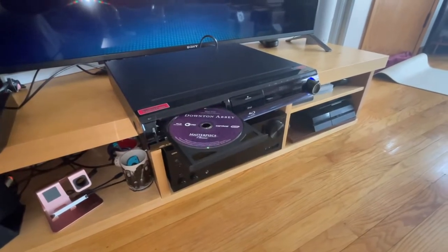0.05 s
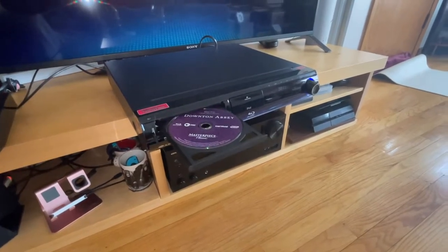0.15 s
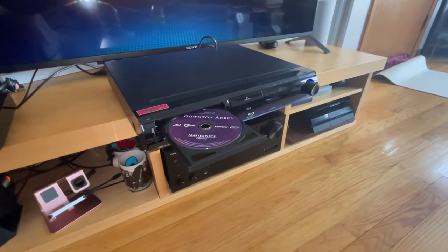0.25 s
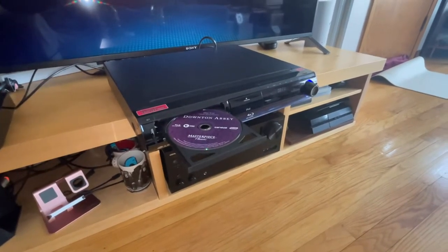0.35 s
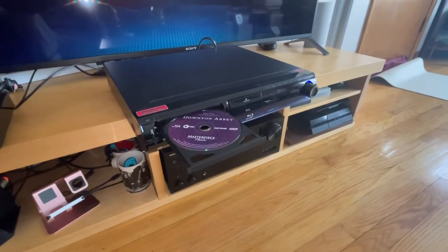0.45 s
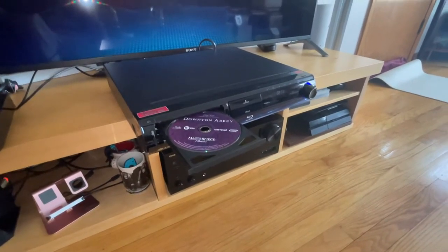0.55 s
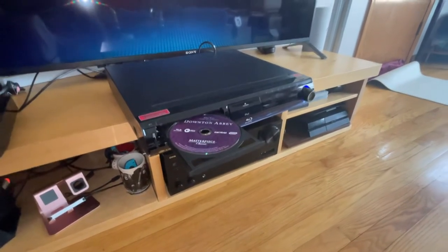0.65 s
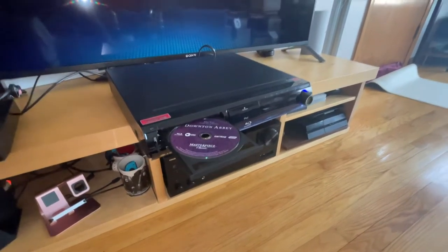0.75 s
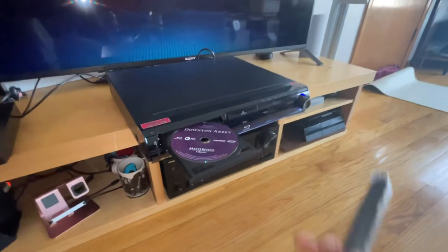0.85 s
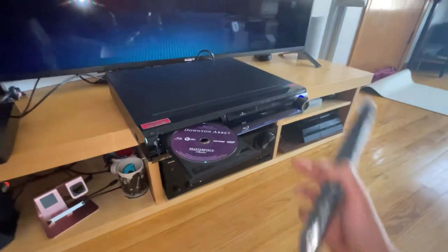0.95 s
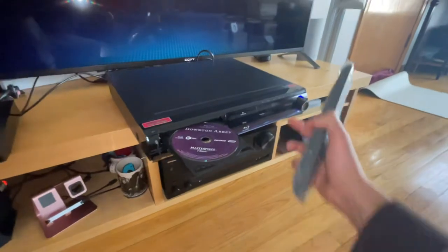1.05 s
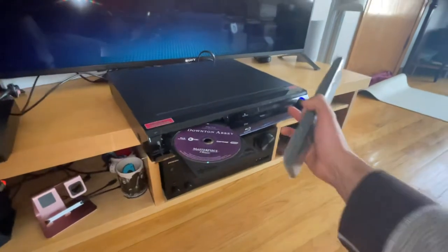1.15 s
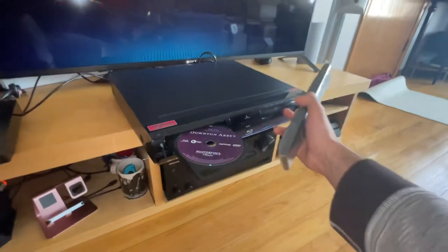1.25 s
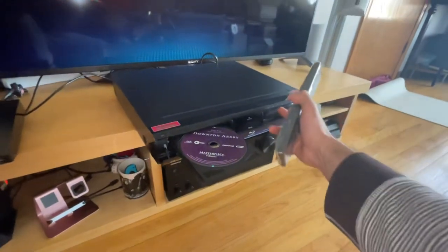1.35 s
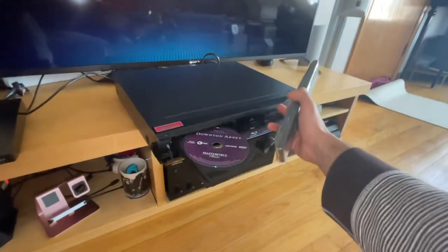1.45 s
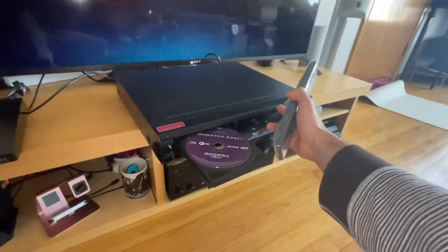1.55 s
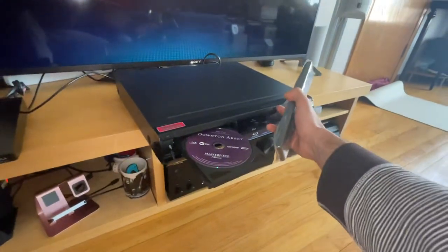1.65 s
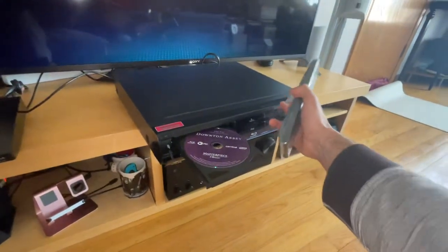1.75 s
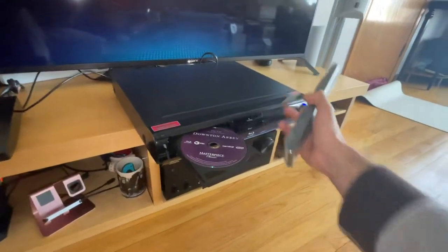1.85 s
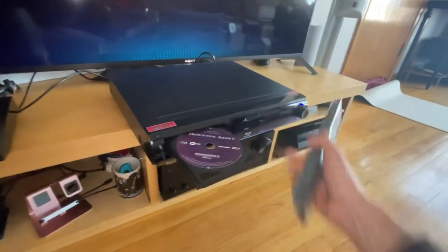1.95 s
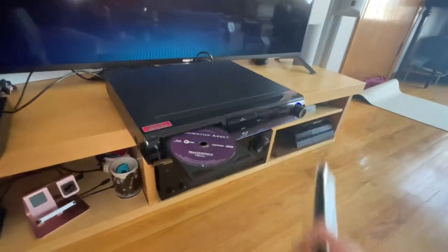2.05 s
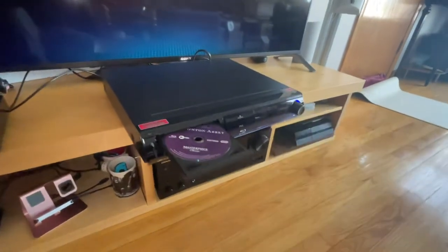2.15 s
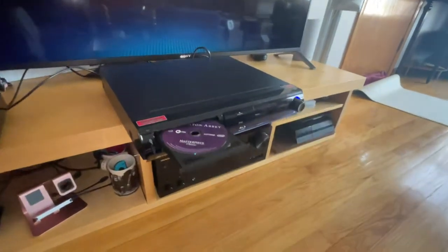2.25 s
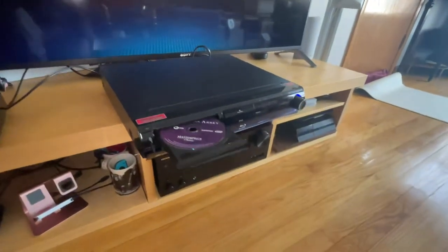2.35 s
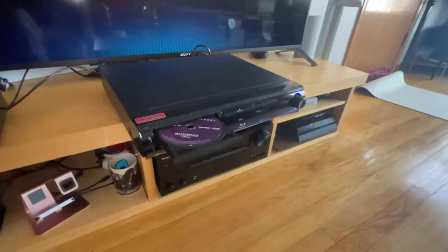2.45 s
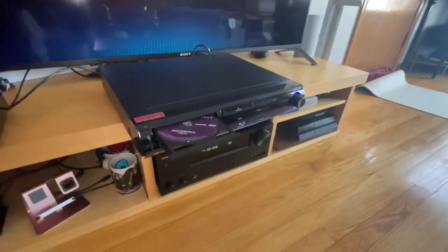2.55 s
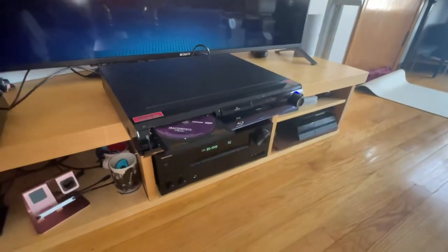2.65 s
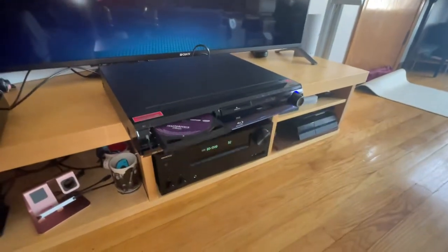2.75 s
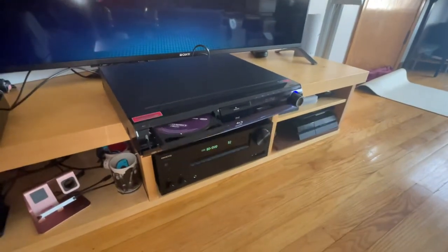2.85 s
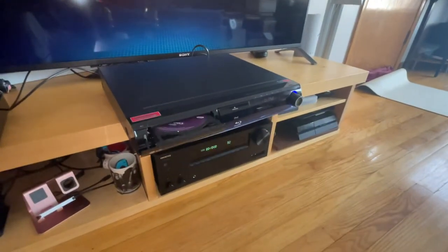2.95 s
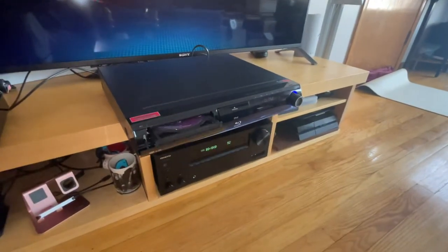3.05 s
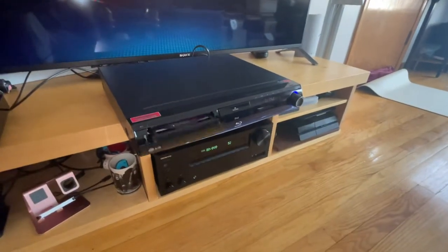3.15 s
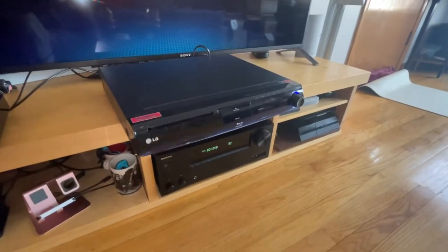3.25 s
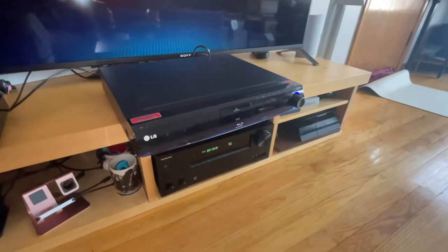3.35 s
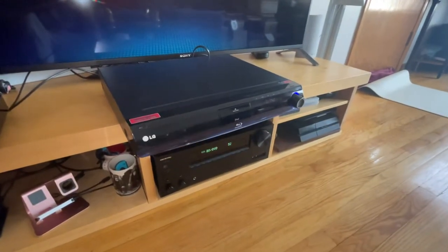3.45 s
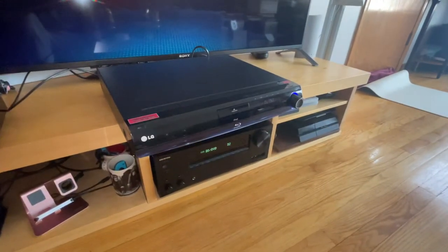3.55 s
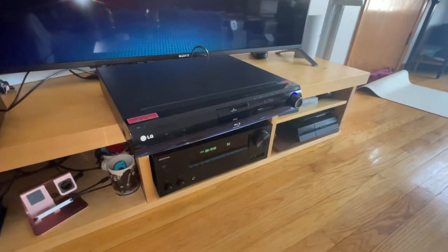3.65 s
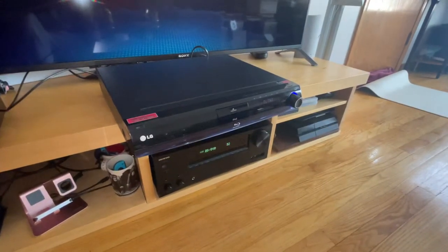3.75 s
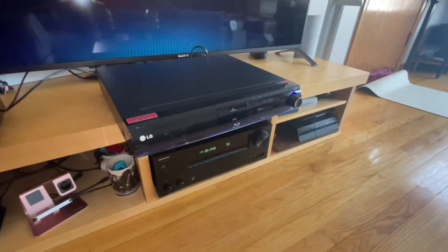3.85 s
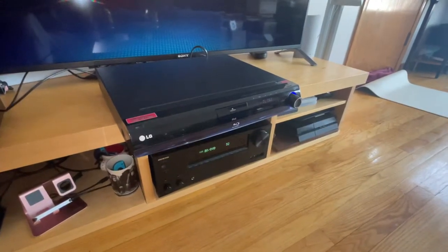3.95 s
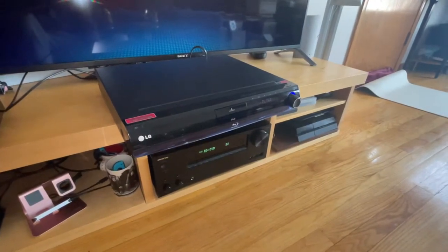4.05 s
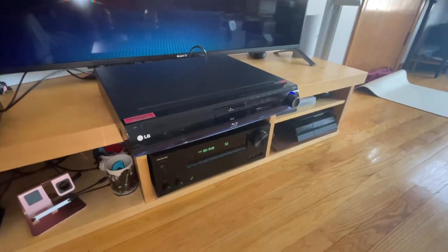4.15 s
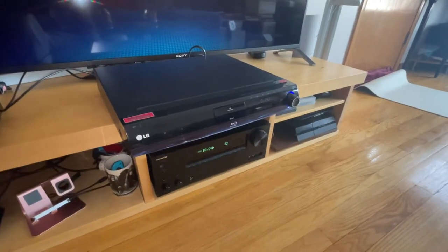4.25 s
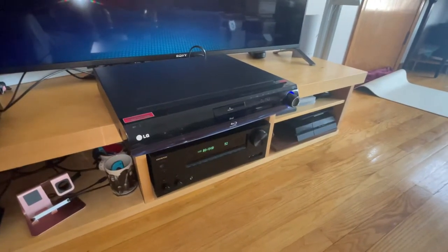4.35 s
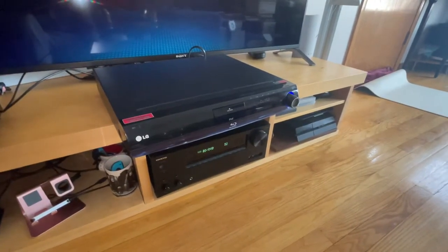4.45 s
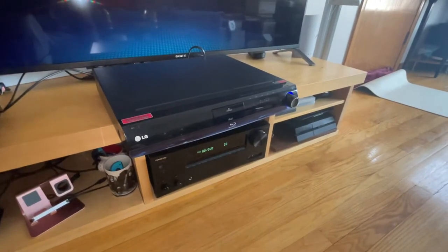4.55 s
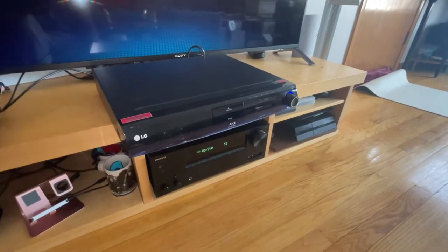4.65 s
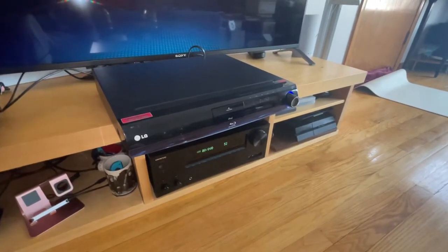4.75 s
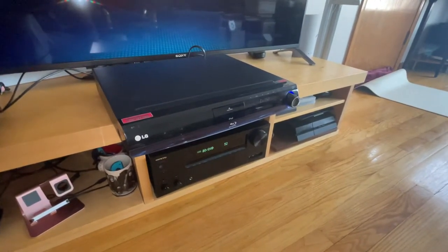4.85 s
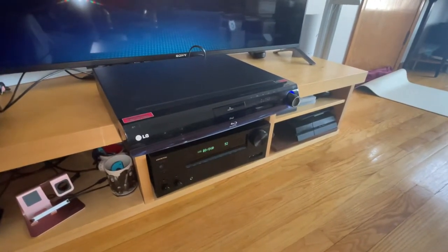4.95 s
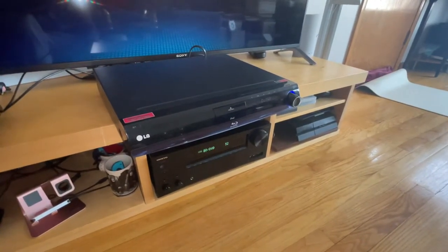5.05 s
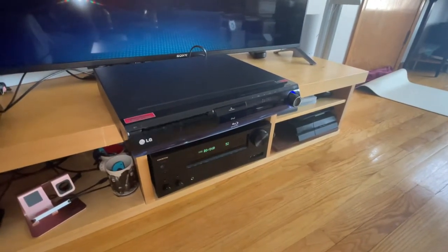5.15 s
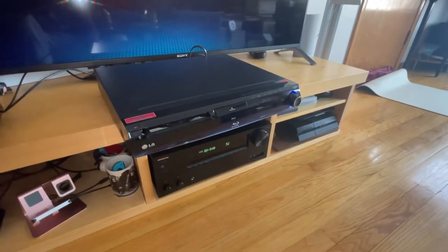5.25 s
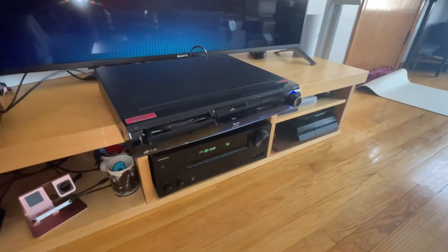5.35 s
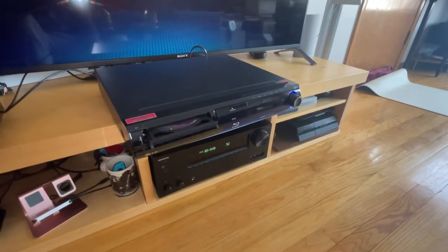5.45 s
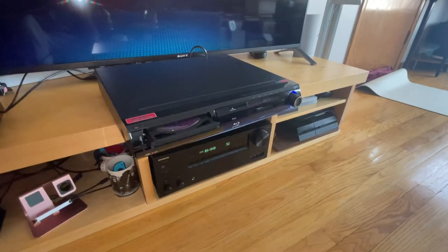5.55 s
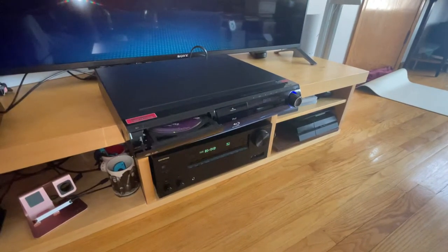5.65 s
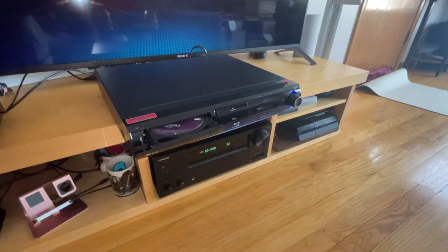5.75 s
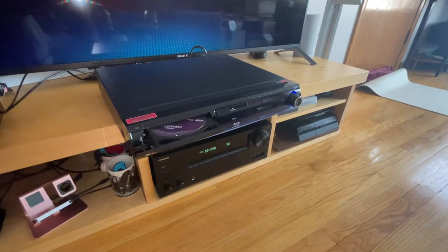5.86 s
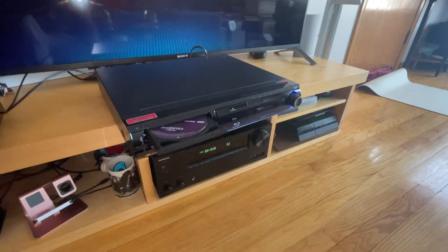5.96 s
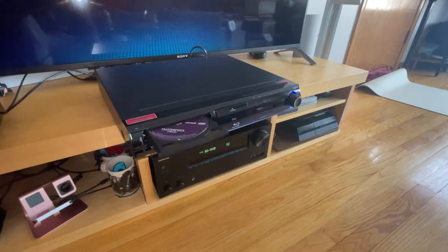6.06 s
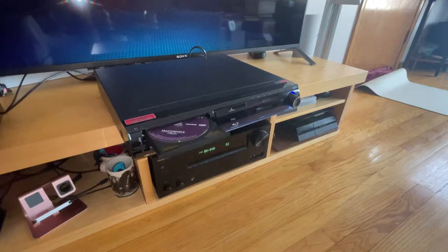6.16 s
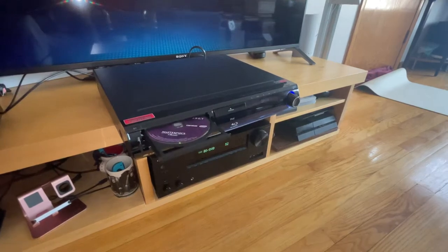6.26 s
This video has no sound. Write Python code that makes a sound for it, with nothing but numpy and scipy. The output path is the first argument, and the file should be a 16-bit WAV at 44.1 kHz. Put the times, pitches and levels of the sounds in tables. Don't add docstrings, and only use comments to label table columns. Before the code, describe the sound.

Close stereo microphone in a quiet, softly furnished living room. A low engine drone passes outside over traffic rumble while a sleeve rustles and a hand-held remote ticks. A disc tray motor starts with a click, whirs and hisses along its rails, then latches with sharp snaps and a hollow plastic clatter. After a quiet pause, the mechanism clunks, unlatches and whirs open again.

```python
import sys
import numpy as np
from scipy import signal
from scipy.fft import rfft, irfft, next_fast_len
from scipy.io import wavfile

SR = 44100
rng = np.random.default_rng(int(sys.argv[2]) if len(sys.argv) > 2 else 0)


def boost(x):
    u = np.asarray(x, float) / 20
    return 10 ** u


def transcribe(signal):
    frames = np.atleast_2d(signal).T
    limited = np.clip(frames, -1, 1)
    pcm = np.round(limited * 32767).astype(np.int16)
    wavfile.write(sys.argv[1], SR, pcm)


N = 278271
T_S = np.arange(N) / SR

# f/Hz, likeness/1
EAR_LIKENESS = [(60, 0.54), (130, 0.85), (290, 0.542), (640, -0.327), (1410, -0.3), (3100, 0.22),
                (6820, -0.08), (15000, 0.39)]

# f/Hz, density/(dB per Hz)
HOUSE_COLOUR = [(10, -29), (22, -12), (35, 0.5), (50, -5.5), (80, -40), (200, -140)]
HOUSE_DB = -68.5
# f/Hz, density/(dB per Hz)
AIR_COLOUR = [(240, -30), (400, -15), (460, -4), (839, -11), (994, -4.5), (1110, -12), (1380, -9),
              (1600, -15.5), (1870, -17.5), (2180, -22.5), (3810, -31.5), (7170, -30.5), (9500, -44.5),
              (12500, -52), (16000, -70)]
AIR_DB = -69.5
WHINE_HZ, WHINE_DB = 8050, -100

# t/s, rumble level/dB
STREET_LEVEL = [(0, -50.5), (.6, -49.5), (2.2, -48), (3.0, -53.5), (3.3, -52.5), (3.7, -53.5), (4.7, -57.5),
                (5.05, -53), (5.2, -57), (5.8, -54), (6.31, -59)]
# f/Hz, density/(dB per Hz)
RUMBLE_COLOUR = [(12, -64), (20, -30), (40, -13), (59, 0.5), (106, -2), (125, -6.5), (291, -9),
                 (358, -18.5), (380, -17), (416, -22), (700, -28), (910, -42), (1540, -120)]
# f/Hz, density/(dB per Hz)
ROAR_COLOUR = [(210, -33.5), (350, -5.5), (665, -19), (704, -10.5), (758, -16.5), (1000, -20),
               (2050, -27.5), (2500, -43.5), (3250, -70), (5500, -120)]
# start t/s, level/dB, attack/s, hold/s, release/(s per 20 dB)
ROAR_SWELLS = [
    (.38, -56, 0.22, 0.0092, 0.36),
    (1.85, -67.5, 0.54, .01, 1),
    (3.04, -60, 0.033, 0.24, 2.5),
    (5.07, -59, 0.063, 0.24, 0.5),
]
ROAR_BELOW_RUMBLE_DB = -20.5
# t/s, f/Hz
ENGINE_SPEED = [(0, 12.6), (.6, 12.79), (1, 12.87), (1.6, 12.97), (1.8, 12.86), (2.2, 11.72), (2.4, 11.3),
                (2.8, 10.9)]
# order/1, start t/s, level/dB, hold/s, release/(s per 20 dB)
ORDER_SWELLS = [(5, -0.274, -42.5, 1.245, 0.23), (5, 1.14, -52, 0.32, -0.5), (5, 1.94, -53, 0.536, 0.1),
                (7, 1.2, -62, .3, 0.9), (8, -0.296, -42.5, 0.53, 0.55), (8, .7, -57.5, 0.29, -1),
                (8, 1.0, -54, .3, .2), (8, 1.55, -50, .65, 0.4), (11, 0.078, -62, .2, -1.2),
                (11, 0.4, -53, 0.46, 0), (11, 1.34, -52.5, 0.41, -0.25), (13, 0.35, -57.5, 0.55, 0.5),
                (13, 1.23, -56, 0.396, 0), (16, -0.069, -56.5, 0.18, -0.7), (16, 0.843, -55.5, 0.25, 0.47),
                (16, 1.159, -52, 0.476, -0.34), (16, 1.7, -55, 0.44, 0.23), (18, -.2, -56.5, 0.738, 0.5),
                (20, -.2, -58, 0.23, 2.1), (21, 0.135, -54.5, 0.57, 0.4), (24, 0.05, -62, 0.65, -0.4),
                (26, 0.39, -64, 0.3, 0.3), (29, 0.605, -63.5, 0.34, 0)]
SWELL_ATTACK_S, ENGINE_GONE_S = .22, 2.8
WAVER_DB = 0.62

# start t/s, level/dB, attack/s, release/(s
# per 20 dB), 4 kHz whisper share/dB
SLEEVE_STROKES = [(-.01, -57, 0.011, -0.03, -8), (0, -84, .01, 5, -12.5), (0.41, -61, 0.0102, 0.22, -9.5),
                  (.477, -65.5, 0.0044, 0.09, -4), (.52, -66.5, 0.14, 0.1329, -7.5),
                  (.782, -71.5, 0.0096, 0.86, -18), (.846, -76, 0.0038, 0.18, -4),
                  (0.851, -63, 0.013, 0.05, -4), (0.935, -61.5, 0.04, 0.0239, 5),
                  (.98, -68, 0.054, 0.5876, -10.5), (1.553, -74, 0.0067, 0.26, -5.5),
                  (1.69, -77, 0.016, 0.25, -6), (6.0, -79.5, 0.18, 8, -14.5), (1.84, -77.5, 0.047, 2, -13)]
# f/Hz, density/(dB per Hz)
SLEEVE_COLOUR = [(590, -18.5), (1000, -2), (1630, -1), (3320, -9), (4460, -12.5), (5470, -7.5),
                 (6560, -1.5), (8320, -5), (11300, -10.5), (12700, -13.5), (16000, -18)]

# t/s, knock peak level/dB, knock f/Hz, snap f/Hz, snap level/dB
TICKS = [(0.421, -58, 1062, 7200, -51.5), (0.443, -57.5, 990, 6590, -50), (0.485, -59, 947, 6300, -53),
         (0.793, -55, 1350, 4700, -62.5), (1.004, -66, 1396, 6100, -51), (1.319, -69, 1060, 8126, -81.5),
         (1.564, -57, 1280, 5330, -55.5), (1.643, -61.5, 1012, 3670, -92), (1.71, -61, 988, 3434, -57),
         (1.925, -59, 1350, 3820, -82), (1.962, -51, 1270, 5970, -62.5), (1.968, -43.5, 1452, 5700, -66),
         (1.976, -54, 1114, 5600, -71), (1.999, -53, 2270, 6300, -58.5), (2.008, -53, 1200, 5000, -67),
         (2.04, -65, 1420, 6600, -48.5), (2.457, -61, 1000, 4470, -49.5), (2.462, -53, 1000, 7330, -44),
         (3.562, -58, 970, 6400, -85), (3.943, -65, 961, 5290, -70), (5.238, -64, 1207, 3890, -63.5),
         (5.299, -59, 1900, 4000, -67), (5.306, -60, 1348, 4000, -80), (5.487, -56, 1105, 7150, -69)]
# t/s, knock peak level/dB, knock f/Hz, snap f/Hz, snap level/dB
STOPS = [(3.104, -56, 1590, 7050, -68.5), (3.122, -50, 1580, 6920, -44), (3.138, -37, 2080, 6310, -30),
         (3.157, -34.5, 2020, 6330, -33.5), (3.3117, -36.5, 1287, 6450, -21.5),
         (3.384, -39, 983, 5930, -78.5), (4.877, -52, 1018, 5770, -95), (4.885, -50.5, 1000, 5770, -85.5),
         (4.95, -48, 1050, 6470, -47.5), (4.956, -44.5, 1740, 6510, -58), (4.994, -47, 890, 8950, -55.5),
         (5.055, -44, 1094, 6200, -47), (5.064, -55, 1150, 6830, -48)]
TICKS_LEFT_DB, STOPS_LEFT_DB = 5.5, 2
SPRING_HZ, SPRING_DB, SPRING_T60_S = 15500, -36, .005
# t/s, peak level/dB, f/Hz, t60/s
THUDS = [(3.144, -44, 564, 0.037), (3.313, -30.5, 532, 0.08), (3.333, -28, 558, 0.043),
         (3.338, -41, 306.3, 0.22), (3.35, -39, 920.6, 0.098), (3.357, -38, 305, 0.14),
         (3.363, -37, 643, 0.062), (3.37, -39, 460, 0.11), (3.378, -44, 294, 0.084),
         (3.384, -34.5, 1226, 0.073), (3.396, -37.5, 527, 0.091), (3.412, -53, 302, 0.056),
         (3.341, -32.5, 605, 0.0485), (3.165, -42, 295.3, 0.16), (3.215, -43, 307.4, 0.118),
         (4.9, -44, 340, 0.077), (4.968, -39, 632, 0.079), (4.991, -34.5, 381, 0.055),
         (5.0, -39, 932, 0.089), (5.016, -33, 292, 0.033), (5.012, -43, 605.7, 0.06),
         (5.074, -45, 345, 0.041), (5.092, -39.5, 327, 0.045), (5.11, -41.5, 604, 0.081),
         (5.112, -41, 360, 0.065), (5.134, -48, 332, 0.048), (5.155, -50, 300, 0.047),
         (2.012, -40, 342, 0.062), (5.3, -54.5, 1570, 0.157), (5.301, -56.5, 2000, .07),
         (5.055, -36.5, 1157, 0.065), (1.969, -49, 1425, 0.062), (1.318, -59, 1040, 0.013),
         (3.158, -46, 2150, 0.066), (3.577, -50, 776, 0.047), (3.616, -38.5, 810, 0.0192),
         (5.054, -33.5, 509.6, 0.1), (5.306, -51, 553, 0.092)]
# t/s, peak level/dB, f/Hz, t60/s
RINGS = [(1.927, -68, 1320, .05), (1.9665, -44, 1410, .05), (1.966, -52, 1190, .04),
         (1.965, -55, 2150, .025), (1.965, -58, 4700, .02), (2.0, -58, 2420, .04), (2.04, -63, 4650, .02),
         (2.4605, -41, 4474, .019), (2.461, -56, 3630, .017), (2.462, -58, 2810, .03),
         (2.462, -60, 1852, .04), (2.463, -48, 6433, .025), (2.463, -54, 9500, .02),
         (3.138, -46, 7850, .008), (3.1385, -53, 4030, .03), (3.157, -46, 11470, .012),
         (3.157, -43, 12900, .008), (3.157, -47.5, 4020, .03), (3.157, -50.5, 2840, .04),
         (3.157, -47, 6869, .02), (3.312, -43.5, 2480, .042), (3.312, -48, 1981, .04),
         (3.312, -41.5, 1050, .04), (3.312, -44.5, 4600, .02), (3.312, -48.5, 3900, .03),
         (3.312, -44, 6000, .03), (3.335, -49.5, 2100, .1), (3.322, -40, 620, .06),
         (3.345, -41.5, 510, .08), (3.383, -43.5, 920, .07), (4.876, -60, 1150, .05),
         (4.949, -50, 1080, .04), (5.054, -46, 1510, .03), (2.43, -55, 263, 0.29),
         (1.709, -64, 3380, 0.052), (1.5645, -62, 4660, .04), (3.578, -55, 845, .03),
         (4.884, -56, 990, .07), (4.949, -49, 2552, .04), (4.949, -49, 2970, .03), (4.951, -57, 3408, .03),
         (4.953, -50, 1830, .07), (4.96, -46, 670, .05), (5.055, -53, 2326, .04),
         (5.054, -34.5, 1094, .043), (5.067, -54, 2000, .04)]
# t/s, peak level/dB
CRACKS = [(.4215, -52), (.4425, -48), (1.5645, -58), (1.709, -60), (1.9655, -56), (2.041, -46),
          (2.4635, -48), (3.1385, -40), (3.1572, -33), (3.159, -36), (3.1605, -40), (3.3121, -24),
          (3.3148, -34), (4.9495, -42), (5.0555, -43), (5.0645, -38)]
ROOM_T60_S, TREBLE_T60_S, TREBLE_HZ, TREBLE_DB = .45, .2, 3000, -7
WALL_CUT_HZ = 6000

# start t/s, stop t/s, steady whir level/dB, extra at start/dB, easing/s
TRAY_RUNS = [
    (1.94, 3.132, -72, 10.5, 0.76),
    (5.12, 6.4, -78, 24.5, 0.25),
]
SPIN_UP_S, UNEVEN_DB = 0.051, 1.2
HISS_DB, HISS_FOLLOWS = -73, 0.94
# f/Hz, width/Hz, level/dB
WHIR_MODES = [(277, 51, 10), (345, 39, 7.5), (1000, 660, -3), (1210, 700, 1.5), (1975, 140, 2.5),
              (1985, 160, 3.5), (2340, 500, -7), (3430, 190, -7.5), (3890, 250, -10.5)]
# f/Hz, density/(dB per Hz)
RAIL_COLOUR = [(880, -21), (1500, -7), (2140, 0), (2720, -13), (3810, -8), (4870, -11), (6240, -6),
               (11700, -14.5), (13100, -7.5), (14300, -8), (16000, -19)]
# f/Hz, width/Hz, level/dB
RAIL_BANDS = [(7070, 180, -1.5), (8100, 90, 1.5), (10240, 90, -8.5), (11300, 61, 5)]
# f/Hz, width/Hz, level/dB
GEAR_MODES = [(550, 407, -1), (900, 90, -3.5), (1150, 902, -0.5), (1310, 407, 2.5), (1939, 430, -1.5),
              (1990, 278, -4), (2750, 830, -22.5), (2900, 360, -17), (3960, 260, -32)]
# f/Hz, density/(dB per Hz)
SCRAPE_COLOUR = [(1290, -13.5), (2200, -2), (2990, -10.5), (5760, -9.5), (7210, -8.5), (9250, -24.5),
                 (11800, -21.5), (13000, -26.5), (14400, -32), (16000, -37.5)]
# start t/s, rise/s, clatter level/dB, scrape level/dB
WIND_UPS = [
    (1.916, 0.064, -54.5, -65),
    (3.087, 0.038, -52.5, -52.5),
    (4.92, 0.032, -52.5, -72),
]
# t/s, clatter level/dB, scrape level/dB, release/(s per 20 dB), first burst/dB
RATTLES = [
    (1.964, -55, -62.5, 0.35, 9),
    (2.46, -68.5, -60.5, 0.3, 8),
    (3.138, -45.5, -47, 0.21, 3),
    (3.315, -40.5, -46, 0.2, 5),
    (0, -56, -63.5, 0, -10),
    (4.951, -49, -57.5, 0.32, 1.5),
    (5.056, -70.5, -60, 0.19, 10.5),
    (5.298, -60, -83.5, 0.1, -6),
    (5.486, -74, -99, 0.8, -7),
]
BURST_S, SCRAPE_LASTS, LET_GO_S = 0.011, 0.55, 0.0315
# f/Hz, width/Hz, level/dB
CASE_MODES = [(215, 120, 1.5), (311.3, 27.1, 3), (347, 99, 3), (512.6, 90, -3.5), (653.7, 121, -4),
              (930, 144, -3.5), (1150, 400, -12)]
# start t/s, level/dB, attack/s, hold/s, release/(s per 20 dB)
SHUDDER = [
    (3.128, -48, 0.0065, 0.051, 0.48),
    (3.305, -42, 0.0303, 0.038, 0.21),
    (4.866, -49.5, 0.0246, 0.021, 0.34),
    (4.94, -43, 0.049, 0.034, 0.0654),
    (5.043, -46, 0.013, 0.0017, 0.19),
]


def rms_one(x):
    return x / np.sqrt(np.mean(x ** 2) + 1e-20)


def in_time(rows):
    return np.interp(T_S, *np.transpose(rows))


def at_hz(points, hz):
    f, value = np.transpose(points)
    return np.interp(np.log(hz), np.log(f), value)


def drift(rate_hz):
    r = np.exp(-2 * np.pi * rate_hz * 40 / SR)
    chance = rng.standard_normal(N // 40 + 2002)
    slow = signal.lfilter([1], [1, -2 * r, r * r], chance)[2000:]
    return np.interp(np.arange(N) / 40, np.arange(len(slow)), rms_one(slow))


def envelope(rows):
    power = np.zeros(N)
    for s, db, attack, hold, release in rows:
        release = max(release, .004)
        end_s = s + attack + hold + 3 * release
        now = slice(max(int(s * SR), 0), max(int(end_s * SR), 0))
        age = T_S[now] - s
        fall_db = 20 * np.maximum(age - attack - hold, 0) / release
        power[now] += (np.clip(age / attack, 0, 1) ** 2 * boost(db - fall_db)) ** 2
    return np.sqrt(power)


def resonate(x, hz, width_hz):
    r = np.exp(-np.pi * width_hz / SR)
    top = [(1 - r * r) / 2, 0, (r * r - 1) / 2]
    return signal.lfilter(top, [1, -2 * r * np.cos(2 * np.pi * hz / SR), r * r], x + 1e-18)


def stereo_noise(spectrum):
    size = next_fast_len(N)
    hz = np.maximum(np.fft.rfftfreq(size, 1 / SR), 1)
    mid, side = rfft(rng.standard_normal((2, size)))
    alike = np.clip(at_hz(EAR_LIKENESS, hz), -.95, .95)
    both = np.sqrt(1 + alike) * mid + np.sqrt(1 - alike) * side * [[1], [-1]]
    return rms_one(irfft(both * boost(at_hz(spectrum, hz)), size)[:, :N])


def grains(per_s, spread_db):
    sizes = boost(spread_db * np.minimum(rng.exponential(1, N), 4))
    sizes = sizes * rng.choice([-1, 1], N)
    return sizes * (rng.random(N) < per_s / SR)


def body(clicks, modes):
    out = np.zeros((2, N))
    for k, (hz, width_hz, level_db) in enumerate(modes):
        turn = np.pi / 4 + min(hz / 900, 1.3) * (-1) ** k
        sides = np.array([[np.cos(turn)], [np.sin(turn)]]) * (-1) ** (k // 2)
        out += boost(level_db) * resonate(clicks, hz, width_hz) * sides
    return rms_one(signal.sosfilt(signal.butter(2, 6000, fs=SR, output="sos"), out))


def background():
    return boost(HOUSE_DB) * stereo_noise(HOUSE_COLOUR) + boost(AIR_DB) * stereo_noise(AIR_COLOUR)


def whine():
    tone = resonate(rng.standard_normal(N), WHINE_HZ, 200)
    tone = resonate(tone, WHINE_HZ, 200)
    return boost(WHINE_DB) * rms_one(tone) * [[1], [-1]]


def traffic():
    rumble_db = in_time(STREET_LEVEL)
    roar = boost(-4.5) * np.hypot(boost(rumble_db + ROAR_BELOW_RUMBLE_DB), envelope(ROAR_SWELLS))
    return boost(rumble_db) * stereo_noise(RUMBLE_COLOUR) + roar * stereo_noise(ROAR_COLOUR)


def engine():
    phase = 2 * np.pi * np.cumsum(in_time(ENGINE_SPEED)) / SR
    out = np.zeros((2, N))
    for order in sorted({round(row[0]) for row in ORDER_SWELLS}):
        swells = [(s, db, SWELL_ATTACK_S, hold, release)
                  for k, s, db, hold, release in ORDER_SWELLS if round(k) == order]
        level = np.sqrt(2) * envelope(swells) * boost(WAVER_DB * drift(4))
        lag = (0.04 + 0.026 * order) * np.array([[-1], [1]])
        start = rng.uniform(0, 2 * np.pi)
        out += level * np.sin(order * phase + start + .05 * drift(3) + lag)
    return out * np.clip((ENGINE_GONE_S - T_S) / 0.058, 0, 1)


def sleeve():
    rustle = envelope([(s, db, attack, 0, release) for s, db, attack, release, _ in SLEEVE_STROKES])
    whisper = envelope([(s, db + share_db, attack, 0, release)
                        for s, db, attack, release, share_db in SLEEVE_STROKES])
    narrow = rms_one(resonate(rng.standard_normal((2, N)), 4368, 890))
    cloth = rustle * stereo_noise(SLEEVE_COLOUR) + boost(0.5) * whisper * narrow
    return cloth * boost([[1.5], [-1.5]])


def contacts(rows, snap_t60_s, ping_db, crack_db, left_db):
    out, t = np.zeros((2, N)), np.arange(2048) / SR
    chance = rng.standard_normal((len(rows), 3, 2, len(t)))
    bright = signal.butter(3, [3000, 15800], "band", fs=SR, output="sos")
    turn = np.array([[.75], [-.75]])
    for (s, knock_db, knock_hz, snap_hz, snap_db), (dull, ring, hiss) in zip(rows, chance):
        thump = resonate(resonate(dull, knock_hz * 1.33, 1410), knock_hz * 1.2, 1430)
        knock = np.sin(2 * np.pi * knock_hz * t + turn) + 0.31 * rms_one(thump)
        knock = knock * np.sin(np.pi / 2 * np.minimum(t / .002, 1)) ** 2
        knock = knock * boost(knock_db + 8 - 60 * t * knock_hz / 28)

        ping = np.sin(2 * np.pi * snap_hz * t + turn) * (1 - np.exp(-t / 0.0008)) ** 3
        ping = ping * boost([[6], [-6]]) * boost(ping_db + 6 - 60 * t / 0.0059)
        snap = rms_one(resonate(ring, snap_hz, 590))
        snap = snap + boost(crack_db) * rms_one(signal.sosfilt(bright, hiss))
        snap = snap * boost(-60 * t / snap_t60_s) * (1 - np.exp(-t / 0.00029))

        spring_db = SPRING_DB + 3 * (snap_db + 25)
        spring = boost(spring_db - 60 * t / SPRING_T60_S) * rms_one(resonate(hiss, SPRING_HZ, 900))
        sound = knock + boost(snap_db - 7.5) * (ping + snap) + spring
        sound = sound * np.minimum(t / 0.0002, 1) * boost([[left_db / 2], [-left_db / 2]])
        i = round(s * SR)
        out[:, i:i + len(t)] += sound[:, :N - i]
    return out


def thuds(rows, rise_s):
    out, t = np.zeros((2, N)), np.arange(8192) / SR
    for s, peak_db, hz, t60_s in rows:
        i = round(s * SR)
        mode = np.sin(2 * np.pi * hz * (t + [[.00015], [-.00015]]))
        out[:, i:i + len(t)] += boost(peak_db - 1 - 60 * t / t60_s) * mode * (1 - np.exp(-t / rise_s))
    return out


def cracks():
    out = np.zeros((2, N))
    for s, peak_db in CRACKS:
        i = round(s * SR)
        out[[0, 1], [i + 1, i]] = boost(peak_db + np.array([6.0, 3.0]))
    return signal.sosfilt(signal.butter(2, 2200, "high", fs=SR, output="sos"), out + 1e-18)


def hits():
    out = contacts(TICKS, snap_t60_s=.025, ping_db=6, crack_db=5, left_db=TICKS_LEFT_DB)
    out += contacts(STOPS, snap_t60_s=.016, ping_db=16, crack_db=-1, left_db=STOPS_LEFT_DB)
    out += thuds(THUDS, rise_s=.00075)
    out += thuds(RINGS, rise_s=.0004) * boost([[2.0], [-2.0]])
    return out + cracks()


def room(x):
    t = np.arange(SR // 2) / SR
    dull = np.exp(-2 * np.pi * WALL_CUT_HZ / SR)
    noise = signal.lfilter([1 - dull], [1, -dull], rng.standard_normal((2, len(t))))
    low = signal.sosfilt(signal.butter(2, TREBLE_HZ, fs=SR, output="sos"), noise)
    tail = low * boost(-60 * t / ROOM_T60_S)
    tail = tail + (noise - low) * boost(TREBLE_DB - 60 * t / TREBLE_T60_S)
    tail = tail * (t > .005)
    tail = signal.sosfilt(signal.cheby2(10, 60, 14000, fs=SR, output="sos"), tail)
    tail = tail / np.sqrt(np.sum(tail ** 2) / 2)
    return signal.fftconvolve(tail, (x[0] + .5 * x[1])[None], axes=1)[:, :N]


def motor_db():
    out = np.full(N, -200.)
    for start, stop, level_db, extra_db, ease_s in TRAY_RUNS:
        runs = (T_S > start) & (T_S < stop)
        age = T_S[runs] - start
        out[runs] = level_db + extra_db * np.exp(-age / ease_s) - 60 * np.exp(-age / SPIN_UP_S)
    return out


def rails():
    noise = stereo_noise(RAIL_COLOUR)
    bands = np.zeros((2, N))
    for hz, width_hz, level_db in RAIL_BANDS:
        bands += boost(level_db - 5 + 6 * drift(12)) * resonate(noise, hz, width_hz + 250)
    return rms_one(noise + bands) * boost([[1.5], [-1.5]])


def shifting(column, lasts):
    rows = [(s, db[column], rise, 0, LET_GO_S) for s, rise, *db in WIND_UPS]
    for s, *db, release, burst_db in RATTLES:
        rows.append((s, db[column], .007, 0, release * lasts))
        rows.append((s, db[column] + burst_db, .003, 0, BURST_S))
    return envelope(rows)


def tray():
    run_db = motor_db() + UNEVEN_DB * drift(4.7)
    hiss_db = HISS_DB + HISS_FOLLOWS * (run_db + 70) + UNEVEN_DB * (.5 * drift(3) + drift(25))
    whir = boost(run_db) * body(grains(1500, spread_db=1.5), WHIR_MODES)
    hiss = boost(hiss_db) * rails()
    clatter = shifting(column=0, lasts=0.794) * body(grains(2503, spread_db=-3.0), GEAR_MODES)
    scrape = shifting(column=1, lasts=SCRAPE_LASTS) * stereo_noise(SCRAPE_COLOUR) * boost([[1.6], [-1.6]])
    shudder = envelope(SHUDDER) * body(grains(900, spread_db=2.0), CASE_MODES)
    return whir + hiss + clatter + scrape + shudder


def scene():
    struck = hits()
    outside = traffic() + engine()
    return background() + whine() + outside + sleeve() + struck + boost(-19.0) * room(struck) + tray()


def band_limit(x):
    return signal.sosfilt(signal.butter(12, 17580, fs=SR, output="sos"), x)


def record(dry):
    def low(x, hz):
        return signal.sosfilt(signal.cheby2(6, 35, hz + 1200, fs=SR, output="sos"), x)

    def band(x, low_hz, high_hz):
        return signal.sosfilt(signal.cheby1(4, 1, (low_hz, high_hz), "band", fs=SR, output="sos"), x)

    mid, side = (dry[0] + dry[1]) / 2, (dry[0] - dry[1]) / 2
    mid = low(mid, 13100) + boost(-18) * band(mid, 15000, 15800) + boost(-13) * band(mid, 13500, 16500)
    side = low(side, 10600) + boost(-3) * band(side, 12800, 15700) + boost(-9) * band(side, 10900, 12800)
    return band_limit(np.array([mid + side, mid - side]))


dry = scene()
out = record(dry)
transcribe(out)
```